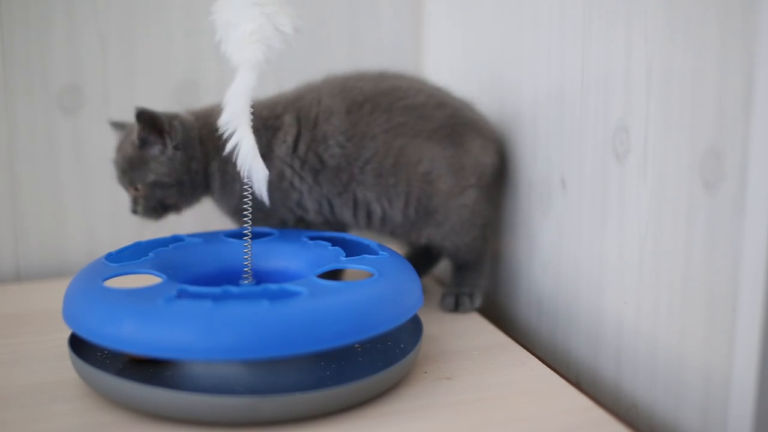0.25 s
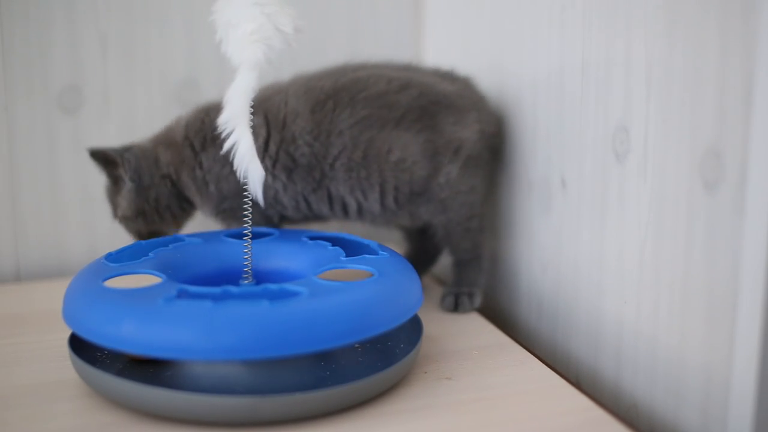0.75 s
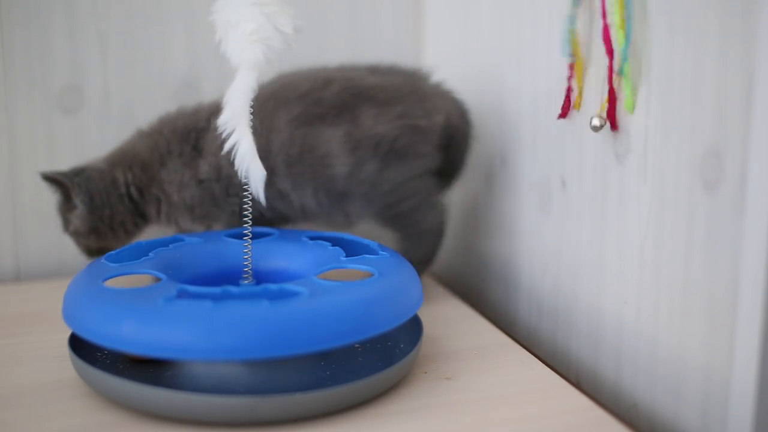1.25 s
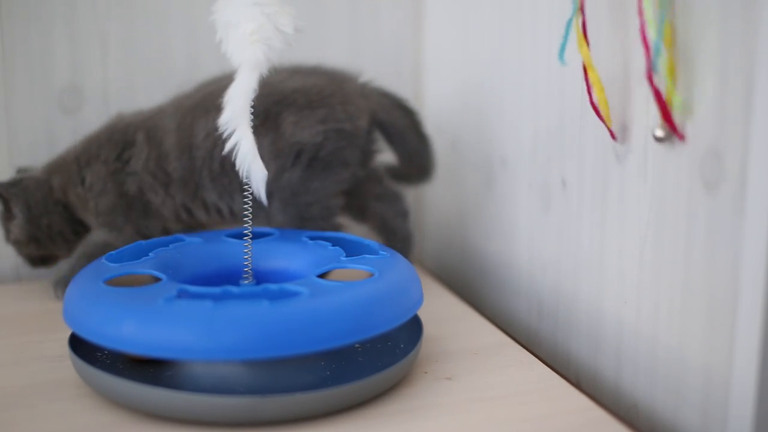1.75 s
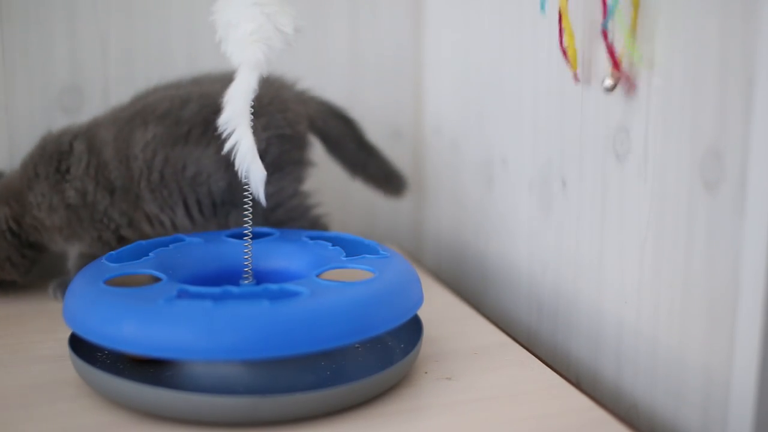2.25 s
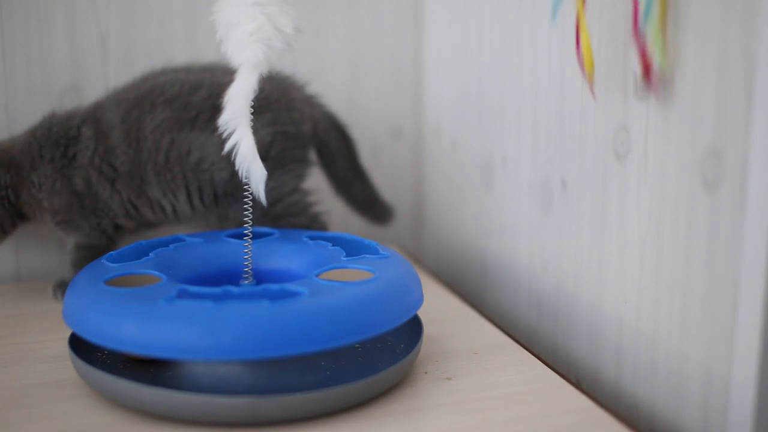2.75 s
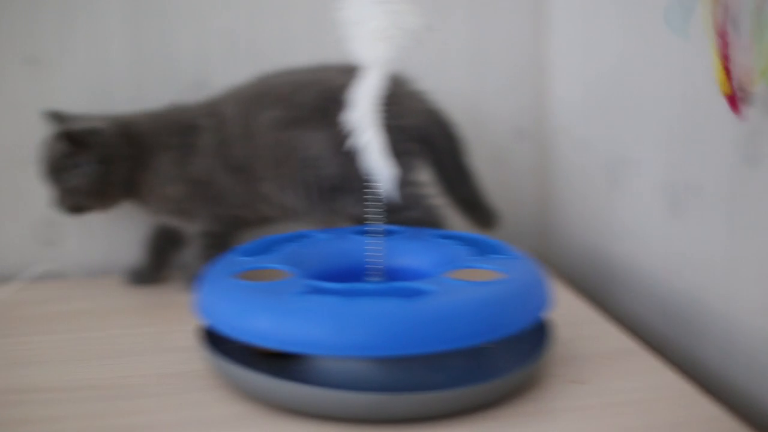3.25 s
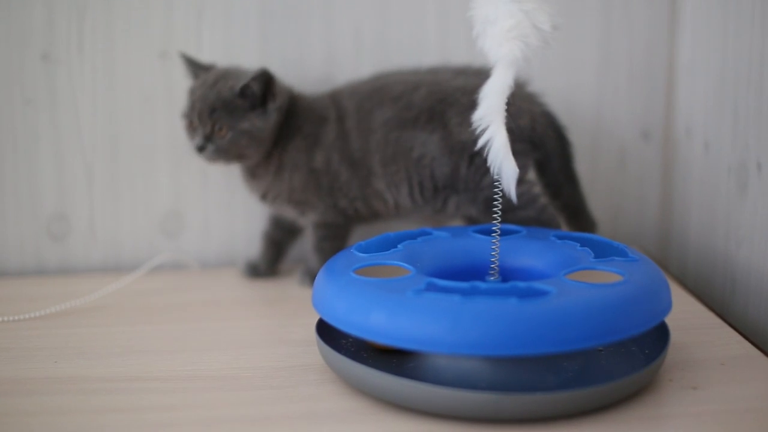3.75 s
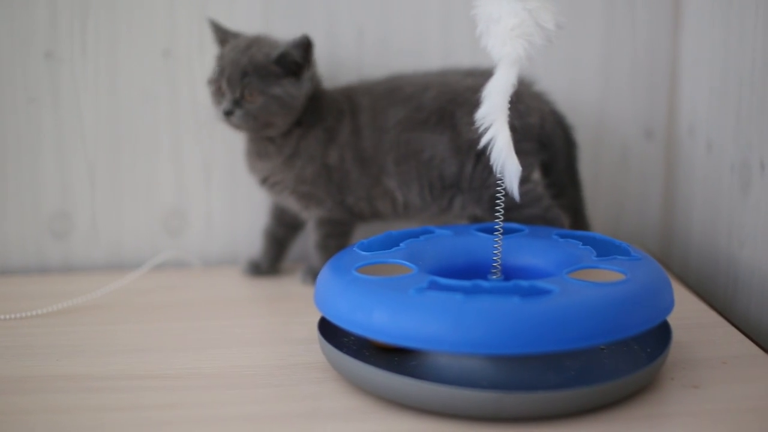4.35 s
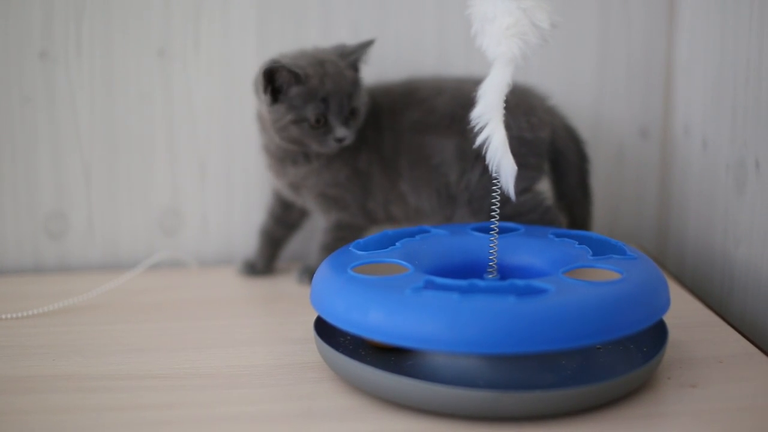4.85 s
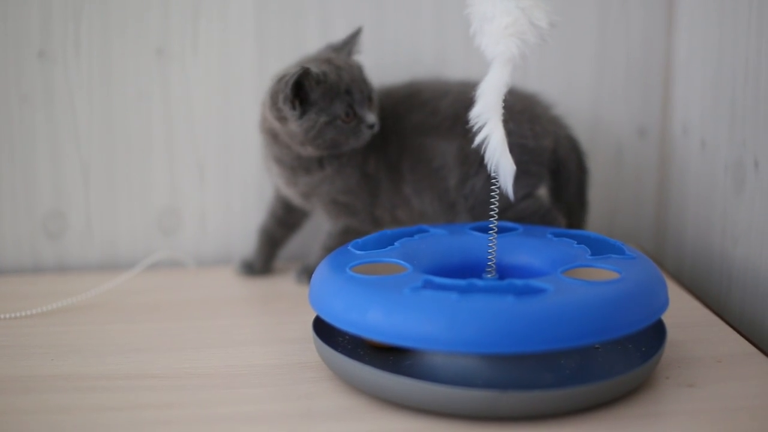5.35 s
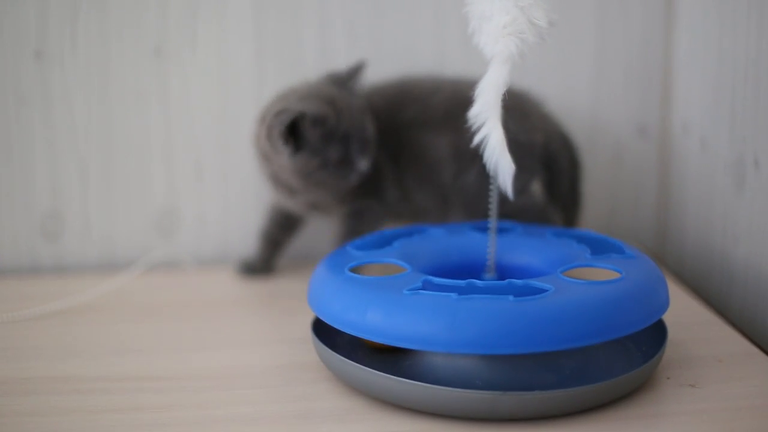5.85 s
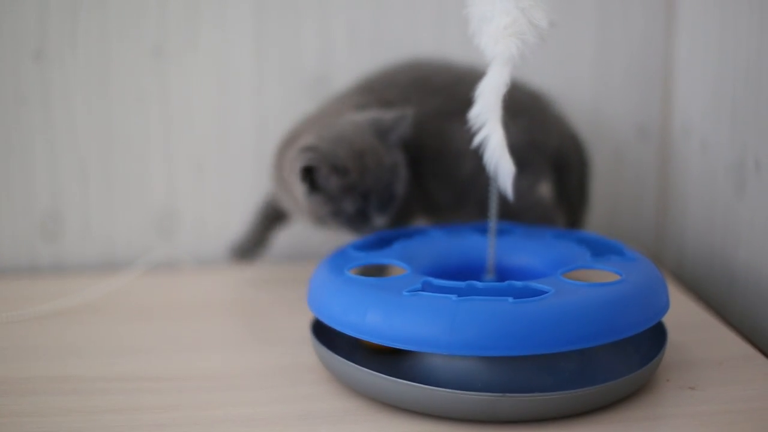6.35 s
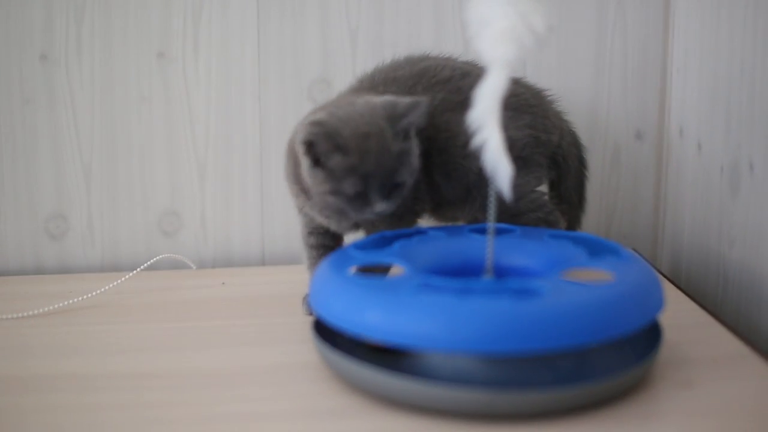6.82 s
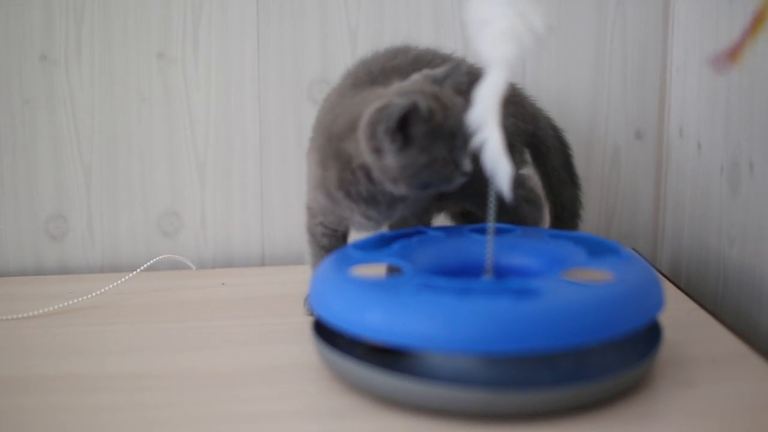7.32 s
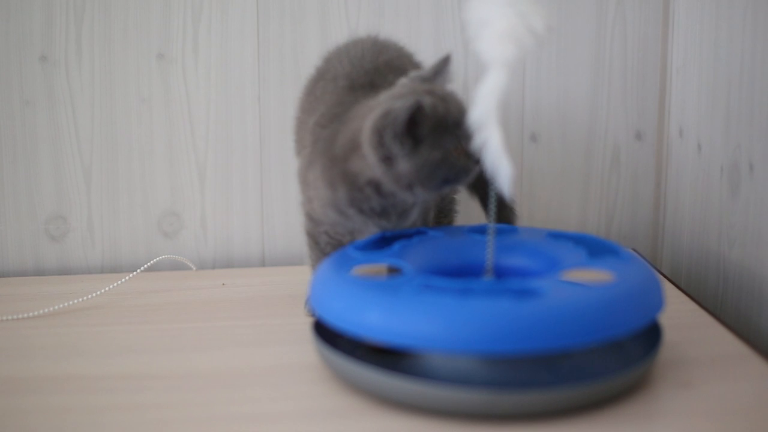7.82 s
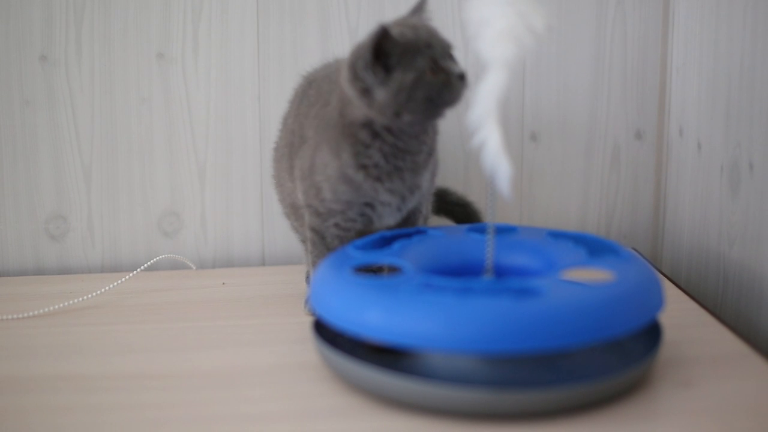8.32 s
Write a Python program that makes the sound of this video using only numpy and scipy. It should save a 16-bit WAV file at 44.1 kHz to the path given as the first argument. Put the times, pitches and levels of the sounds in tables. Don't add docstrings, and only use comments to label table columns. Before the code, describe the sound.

A small bare room with short bright echoes, steady soft hiss and faint low handling rumble. Little else happens until 1.2 seconds, when a tiny thin metal bell jingles softly, followed by a rap on wood at 1.4 and light ribbon rustle. A clearer jingle comes at 2.1, a strong rap at 2.25. From 2.7 to 3.6 the bell rings hard and repeatedly, with loud, boxy hollow plastic knocks close to the microphone, a sharp catch and duller thumps. Firm wooden raps quicken between 3.8 and 4.8, with a bright tip bounce at 4.2 and a jingle at 4.84. A stick scrapes the plastic rim around 5.2; a knock, clicks and grainy dragging follow from 5.45, with a loud click at 6.36 and rustling until 6.7. Separate raps fall at 7.2, 7.9 and 8.3, with a soft jingle around 7.6 and a last click at 8.5.

```python
import sys
import numpy as np
from scipy import signal
from scipy.fft import rfft, irfft, next_fast_len
from scipy.io import wavfile
from scipy.ndimage import map_coordinates

SR = 44100
rng = np.random.default_rng(int(sys.argv[2]) if len(sys.argv) > 2 else 0)


def voltage_ratio(level):
    return 10 ** (np.asarray(level, float) / 20)


def bounce(signal):
    frames = np.transpose(np.atleast_2d(signal))
    limited = np.clip(frames, -1, 1)
    pcm = np.round(limited * 32767).astype(np.int16)
    wavfile.write(sys.argv[1], SR, pcm)


N = 378378
SPAN = 2 ** 15
HZ, T = np.fft.rfftfreq(SPAN, 1 / SR), np.arange(SPAN) / SR


def raps():
    # (t/s, peak level/dB, snap/dB, tick/dB, body/dB)
    rap_events = [(1.427, -18.5, -14.5, -25, -1), (1.702, -36, -25, -29, -9), (1.812, -34.5, 17, 14.5, -5),
                  (1.891, -35, -56, -32, 6), (2.25, -10.5, -8.5, -20, -1.5), (2.77, -25, -16, -29, 1.5),
                  (3.1162, -16.5, -7.5, -22, 3), (3.2806, -20, -14.5, -29, -2.5),
                  (3.837, -12.5, -12, -25, -3), (4.2148, -8.5, -9, -20, -4), (4.4051, -10.5, -7, -15.5, -3),
                  (4.562, -13, -8, -18.5, -4), (4.708, -35, 11, 9, -5), (4.751, -27.5, 8, 1.5, -1),
                  (4.8146, -16, -14, -24, -5), (5.084, -35, -1.5, -2, -5.5),
                  (5.258, -21.5, -9.5, -23, -1.5), (6.786, -35.5, -28, -19, -6.5),
                  (7.201, -17, -8.5, -24.5, -2), (7.56, -32.5, -18, -21, -2),
                  (7.895, -15, -11, -29.5, -3.5), (8.284, -11.5, -9.5, -28, -3),
                  (8.474, -21, -13.5, -29.5, -3)]
    # (f/Hz, level/dB per Hz)
    wood = [(60, -51), (110, -19), (190, -11.5), (238, -25), (285, -0.5), (600, 1), (1200, -3.5),
            (2010, -6), (3760, -13.5), (5200, -23.5), (9000, -30), (11500, -42), (14000, -54), (15800, -63)]
    # (f/Hz, width/Hz, level/dB)
    board_modes = [(331, 143, -0.5), (573, 48, -7), (1050, 70, -11), (1365, 75, -4.5), (1470, 18, -11),
                   (1775, 22, -10), (1962, 120, -10)]
    # (f/Hz, width/Hz, depth 0-1)
    hollows = [(482, 27, 0.1), (791, 28, 0.57), (1248, 70, 0.57), (2180, 110, 0.44)]
    standing_hz = [115, 193, 283, 352, 428, 530, 560, 596, 622, 652, 702, 848, 960, 1055, 1161, 1381, 1850,
                   1987, 1335, 2500]
    # (level/dB, t60/s)
    standing_decay = [(0, 0.27), (-2, 0.41), (2, 0.16), (5, 0.13), (1, 0.2), (-1.5, 0.12), (2, 0.17),
                      (2.5, 0.19), (4, 0.19), (-2, 0.17), (1, 0.18), (7.5, 0.096), (3, 0.21), (5, 0.12),
                      (4, 0.1), (-19, 0.11), (-15, 0.1), (-2, 0.2), (-5, .15), (-1, 0.26)]
    # (delay/s, level/dB)
    wall_answers = [(.0053, -9), (.0105, -10)]

    wood_db = along(wood, HZ)
    board = sum(voltage_ratio(db) / (1 + (2 * (HZ - hz) / width) ** 2) for hz, width, db in board_modes)
    colour_db = wood_db + 20 * np.log10(1 + 0.94 * board / (voltage_ratio(wood_db) + 0.11))
    for hz, width, depth in hollows:
        colour_db += 20 * np.log10(1 - depth / (1 + (2 * (HZ - hz) / width) ** 2))

    hz = np.array(standing_hz)[:, None]
    level, t60 = np.transpose(standing_decay)[..., None]
    waves = voltage_ratio(level - 60 * (T / t60) ** 1.026) * np.sin(2 * np.pi * (hz * T + rng.random(hz.shape)))
    waves = waves * (1 - np.exp(-T / 0.02)) * (T < .6)

    spike = (T == 0) - 0.48 * (T == T[2])
    spike = spike + sum(voltage_ratio(db) * np.roll(spike, round(late * SR)) for late, db in wall_answers)
    fills = 1 - np.exp(-(T / 0.0021) ** 2)
    sparse = 1 - 0.3 / (1 + 1j * HZ / 885)

    firm_db = -29.5
    out = np.zeros(N + SPAN)
    for s, db, snap_db, tick_db, body_db in rap_events:
        thud_db = -22.0 + 1.33 * max(firm_db - db, 0)
        direct_db = -1.0 + 0.51 * (db - firm_db)
        tilt_db = along([(180, thud_db + 19.5), (380, (thud_db + 20.5) / 2 + body_db), (700, 0),
                         (2900, snap_db + 6.0), (8000, tick_db + 16.0),
                         (13000, tick_db + 28.0 + 0.42 * direct_db)], HZ)
        diffuse = irfft(rfft(echo() * fills) * sparse)
        standing = voltage_ratio(rng.normal(-50, 1.07, len(waves))) @ waves
        push = diffuse + standing + voltage_ratio(direct_db - 13.0) * spike
        add(out, s, voltage_ratio(db + 28.5) * struck(push, colour_db + tilt_db))
    return out[:N]


def thumps():
    # (t/s, peak level/dB, f/Hz, t60/s)
    pushes = [(2.839, -35, 67.4, 0.14), (2.911, -40.5, 133, 0.21), (3.491, -42.5, 111, 0.18),
              (3.588, -26.5, 243, 0.12), (3.615, -21, 239, 0.073), (3.659, -30, 206, 0.11),
              (5.515, -30.5, 113.5, 0.24), (6.024, -44, 103, 0.19), (6.107, -37, 192, 0.087),
              (6.361, -32, 442, .05), (6.401, -36, 310, 0.058), (7.558, -41.5, 289.5, 0.35)]
    out = np.zeros(N + SPAN)
    for s, db, hz, t60 in pushes:
        fade = voltage_ratio(db + 4.0 - 60 * T / t60) * (1 - np.exp(-T / 0.0035))
        add(out, s, fade * np.sin(2 * np.pi * hz * T))
    return out[:N]


def late_chatter():
    # (t/s, peak level/dB)
    bright_bursts = [
        (4.219, -25),
        (4.4095, -38),
        (4.569, -38),
        (7.206, -37),
        (7.902, -32),
        (8.29, -24),
    ]
    # (f/Hz, level/dB per Hz)
    bright_colour = [(3000, -29), (7000, -3), (11500, 7), (15800, -10)]
    return chatter([(s, db, -20, 0, .021, -4) for s, db in bright_bursts], bright_colour)


def bell():
    # (t/s, lowest level/dB, second/dB, main/dB, crack/dB)
    low_strikes = [(1.235, -63, -67.0, -54.0, -52), (1.272, -71, -68, -67, -64),
                   (1.302, -72.0, -71.0, -65, -57), (1.345, -85.0, -85.0, -82.0, -70),
                   (1.7683, -63.0, -72.0, -59.0, -51.5), (2.1107, -39.5, -58.0, -44.5, -44.5),
                   (2.138, -65, -59, -44.0, -59.0), (2.165, -85.0, -68.0, -60, -67),
                   (2.222, -59, -72.0, -72.0, -47), (2.7361, -60.0, -54.0, -35, -34.5),
                   (2.753, -49, -39, -30.5, -40.5), (2.782, -56.0, -85.0, -85.0, -60.0),
                   (2.945, -45, -53.0, -47, -34.5), (2.998, -48.0, -52.0, -50.0, -52),
                   (3.04, -83, -55, -53.0, -68), (3.129, -54.0, -58.0, -45.0, -36),
                   (3.165, -58.0, -56, -56.0, -46), (3.3075, -58.0, -46.0, -33.0, -39.5),
                   (3.322, -51, -50.0, -85.0, -41), (3.337, -59.0, -68.0, -83, -55.0),
                   (3.385, -56.0, -64, -63, -54), (3.459, -57, -61.0, -64.0, -41.5),
                   (3.468, -43, -66.0, -57, -62), (3.604, -59, -61.0, -52.0, -47.0),
                   (4.22, -57.0, -55.0, -55.0, -49), (4.841, -47, -54, -41, -41.5),
                   (4.856, -77, -43, -63.0, -52), (4.895, -57.0, -70.0, -60, -71),
                   (4.945, -71, -78, -76, -72.0), (7.5672, -85.0, -62, -50, -62),
                   (7.592, -60.0, -62, -53.0, -56.0), (7.641, -71.0, -88, -82, -68),
                   (7.653, -60, -59.0, -46.0, -43), (7.672, -59, -66.0, -62, -57),
                   (7.687, -85.0, -77.0, -73, -56), (7.715, -57, -76.0, -85.0, -68),
                   (7.746, -87, -67.0, -53, -69), (7.809, -76.0, -74.0, -85.0, -82)]
    # (t/s, middle level/dB, upper/dB, high/dB, top/dB)
    high_strikes = [(1.234, -67.0, -61.0, -53.0, -81.0), (1.272, -73.0, -73.0, -80.0, -85.0),
                    (1.302, -67.0, -68.0, -66.0, -85.0), (1.345, -85.0, -85.0, -78.0, -85.0),
                    (1.7686, -69.0, -59.0, -59.0, -85.0), (2.1095, -56.0, -53.0, -46.0, -74.0),
                    (2.138, -67.0, -58.0, -85.0, -71.0), (2.165, -73.0, -69.0, -66.0, -85.0),
                    (2.2213, -65.0, -65.0, -64.0, -76.0), (2.7367, -45.0, -46.0, -38.0, -77.0),
                    (2.752, -51.0, -41.0, -46.0, -53.0), (2.782, -64.0, -62.0, -49.0, -85.0),
                    (2.946, -45.0, -41.0, -44.0, -63.0), (2.998, -55.0, -49.0, -52.0, -62.0),
                    (3.04, -76.0, -72.0, -56.0, -85.0), (3.1294, -53.0, -51.0, -48.0, -78.0),
                    (3.165, -64.0, -54.0, -85.0, -74.0), (3.3077, -53.0, -52.0, -51.0, -57.0),
                    (3.322, -56.0, -51.0, -70.0, -85.0), (3.338, -68.0, -58.0, -53.0, -85.0),
                    (3.385, -63.0, -62.0, -59.0, -67.0), (3.458, -50.0, -50.0, -56.0, -66.0),
                    (3.468, -75.0, -63.0, -48.0, -82.0), (3.604, -56.0, -53.0, -55.0, -75.0),
                    (4.219, -60.0, -58.0, -56.0, -85.0), (4.8415, -56.0, -46.0, -53.0, -77.0),
                    (4.856, -59.0, -65.0, -40.0, -75.0), (4.895, -68.0, -59.0, -66.0, -85.0),
                    (4.945, -81.0, -85.0, -85.0, -85.0), (7.5672, -74.0, -67.0, -71.0, -80.0),
                    (7.591, -68.0, -61.0, -79.0, -74.0), (7.641, -76.0, -70.0, -65.0, -85.0),
                    (7.654, -62.0, -56.0, -51.0, -69.0), (7.672, -61.0, -61.0, -63.0, -79.0),
                    (7.688, -63.0, -53.0, -62.0, -80.0), (7.715, -82.0, -69.0, -67.0, -85.0),
                    (7.745, -77.0, -85.0, -75.0, -85.0), (7.81, -85.0, -85.0, -85.0, -85.0)]
    mode_hz = [2772, 4116, 4416, 4885, 4901, 8270, 8580, 9012, 9604, 10088, 10130, 11535, 11558, 15390]
    # (level/dB, t60/s)
    mode_decay = [(-17, .15), (-1, .28), (1, .3), (-7, .3), (-1, .32), (-3, .12), (-3, .16), (2, .28),
                  (2, .29), (-3, .28), (0, .29), (-2, .29), (1, .29), (3, .25)]
    # (f/Hz, level/dB per Hz)
    crack_colour = [(2500, -32), (4000, -3), (6000, -10), (7800, -2), (8800, -2), (10500, -9), (12000, -11),
                    (13500, -13), (15500, -22)]
    # (t/s, length/s, level/dB)
    rolls = [
        (1.3, .09, -57),
        (2.22, .04, -55),
        (3.49, 0.057, -51),
        (7.68, .06, -51),
    ]
    # (f/Hz, level/dB per Hz)
    jangle = [(3500, -40), (4100, -14), (4800, 6), (5200, -5), (5600, -24), (7000, -15), (9000, -14),
              (12500, -26), (15800, -40)]

    hz = np.array(mode_hz)[:, None]
    level, t60 = np.transpose(mode_decay)[..., None]
    half, clock = T[:SPAN // 2], np.arange(N + SPAN) / SR
    fade = voltage_ratio(level - 60 * half / t60) * (1 - np.exp(-half / 0.00054))

    quiver_rate, quiver_rad, flutter_db = 110, .75, 2.5
    knots = rng.standard_normal((2 * len(hz), round(clock[-1] * quiver_rate) + 2))
    knots[1::2] = voltage_ratio(flutter_db * knots[1::2])
    wander = np.array([np.interp(clock * quiver_rate, np.arange(len(row)), row) for row in knots])
    phase = 2 * np.pi * hz * clock + quiver_rad * np.sqrt(hz / 10 ** 4) * wander[::2]
    swing = wander[1::2] * np.sin(phase)

    rebound_s, rebound_db = 0.02, -3.5
    out = np.zeros(N + SPAN)
    for (s, *low_db, crack_db), (_, *high_db) in zip(low_strikes, high_strikes):
        share = np.repeat([*low_db, *high_db], [2, 1, 2, 4, 2, 2, 1])
        gain = np.hypot(voltage_ratio(share), voltage_ratio(crack_db - 24))
        ring = gain @ (fade * swing[:, round(s * SR):][:, :SPAN // 2])
        ring = np.pad(ring, (0, SPAN // 2))
        flights = np.cumsum(np.r_[0, rebound_s * SR * (.5 + rng.random(size=3))]).astype(int)
        pellet = sum(voltage_ratio(2 * k * rebound_db) * (T == T[late]) for k, late in enumerate(flights))
        walls = echo()
        near_walls = walls * voltage_ratio(-60 * T / 0.82)
        add(out, s, 0.95 * ring + 0.4 * irfft(rfft(ring) * rfft(near_walls)))
        crack = irfft(rfft(walls + 0.34 * (T == 0)) * rfft(pellet))
        add(out, s, voltage_ratio(crack_db + 28.5) * struck(crack, along(crack_colour, HZ)))
    rolling = swells(rolls)[0] * unit(voltage_ratio(3.5 * wobble(150)) * noise(jangle))
    return out[:N] * voltage_ratio(1.7 * wobble(55)) + rolling


def close_taps():
    # (t/s, peak level/dB, thud/dB, tick/dB, t60/s)
    taps = [(2.835, -21, -28, -23, 0.028), (2.851, -10.5, -30, -12, 0.13), (2.8673, -11, -13, 1.5, 0.13),
            (2.8771, -5.5, -27, -12.5, 0.041), (3.0491, -15, -20, -29, 0.073), (3.145, -3, -27, -21, 0.025),
            (3.1949, -21, -66, -11, 0.019), (3.561, -36, -6, -5, 0.041), (3.5768, -39, -21, -39, 0.039),
            (3.5891, -18, -15.5, -48, 0.098), (3.6178, -19, -16.5, -19, 0.037),
            (3.6247, -16.5, -16, -45, 0.1), (5.485, -21.5, -28, -30, 0.033), (5.511, -9, -35.5, -37, 0.34)]
    # (f/Hz, level/dB per Hz)
    hollow_colour = [(59, -42), (100, 1.5), (319, 4.5), (1130, -4.5), (1430, 1), (1690, -6.5), (2090, -5),
                     (2320, -12), (2630, -8.5), (3180, -9), (5170, -14.5), (5870, -24), (7730, -15),
                     (11800, -23.5), (15500, -31)]
    return chatter([(*row, -2) for row in taps], hollow_colour)


def plastic_clicks():
    # (t/s, peak level/dB, thud/dB, tick/dB, room/dB)
    click_events = [(1.7233, -37.5, 7, -5, 14), (5.448, -36.5, -24, 13, 7.5), (5.4755, -36, -22, -8, -15),
                    (5.499, -33, -24, 1, -12), (5.5132, -19.5, -21, -23, -22), (5.5675, -43, -20, 14, -12),
                    (5.658, -27.5, -38, -16, -22), (5.678, -32, -28, -34, -17), (5.7117, -37.5, 2, -5, -15),
                    (5.77, -38.5, -3, -12, -16), (5.7993, -35, -5, -6, -2), (5.8169, -37, -6, -4, -10),
                    (5.876, -36.5, -11, -1, -8), (5.888, -39, -7, -8, -10), (6.1495, -41, 1, -16, 0),
                    (6.3608, -14, -16, -5, -11.5), (6.3966, -19.5, -10.5, -15, -7.5),
                    (8.5284, -28.5, -17, 1, -16)]
    # (f/Hz, level/dB per Hz)
    plastic_colour = [(120, -27), (200, -9.5), (447, -7), (1470, -13.5), (2940, -5), (3530, -6), (4240, -1),
                      (4990, -11.5), (6330, -14.5), (7070, -14), (8030, -9.5), (9820, -15), (15800, -37)]
    t60 = 0.016
    return chatter([(*row[:-1], t60, row[-1]) for row in click_events], plastic_colour)


def stick_on_rim():
    # (t/s, length/s, level/dB)
    slide = [
        (5.19, 0.091, -36),
    ]
    # (t/s, peak level/dB)
    rim_clicks = [
        (2.8396, -22),
        (5.1417, -36),
        (5.1557, -28),
        (5.169, -38),
        (5.1936, -27),
        (5.204, -30),
        (5.217, -29),
        (5.233, -47),
        (7.714, -43),
    ]
    # (f/Hz, level/dB per Hz)
    rim_colour = [(350, -62), (600, -29), (855, -13), (1030, -25), (1300, -9), (1530, -7.5), (1990, 0.5),
                  (2340, -4), (2640, 3.5), (2990, -1), (3250, -12), (3600, -4), (4050, -14), (4700, -1),
                  (5200, -14), (6060, -17), (8070, -15), (15500, -34)]
    scrape = swells(slide)[0] * unit(grains() * noise(rim_colour))
    return scrape + chatter([(s, db, -15, -8, .03, -6) for s, db in rim_clicks], rim_colour)


def rustle():
    # (fastest moment t/s, length/s, scrape level/dB, swish level/dB)
    drags = [(1.31, 0.14, -68, -66), (1.55, 0.072, -56, -59.5), (1.67, 0.29, -58.5, -63),
             (2.024, 0.084, -49, -56.5), (2.5, 0.27, -52.5, -58), (2.62, 0.079, -54.5, -61),
             (5.46, 0.063, -51, -57), (5.506, 0.04, -42.5, -55), (5.555, 0.069, -42.5, -62),
             (5.61, .06, -60, -54.5), (5.65, 0.18, -52.5, -69), (5.82, 0.21, -52, -62),
             (6.08, 0.11, -52.5, -65), (6.31, 0.14, -61, -65.5), (6.45, 0.057, -62, -66),
             (6.535, 0.15, -47, -58), (6.66, 0.13, -50.5, -61)]
    # (f/Hz, level/dB per Hz)
    scrape_colour = [(240, -37.5), (400, -13.5), (480, -14.5), (864, -8), (1070, -21), (1520, -10.5),
                     (2510, -12.5), (6000, -26.5), (7800, -27), (13200, -120)]
    # (f/Hz, level/dB per Hz)
    swish_colour = [(2940, -8), (5000, -6), (6040, -10), (8140, -1), (13900, -8), (15500, -30)]
    # (t/s, length/s, level/dB)
    soft_raps = [
        (2.045, 0.08, -43.5),
        (2.46, 0.14, -53),
        (2.625, 0.071, -48),
        (6.12, 0.037, -49),
    ]
    # (f/Hz, level/dB per Hz)
    soft_wood_colour = [(150, -48), (250, -7), (606, 5), (770, -12), (836, 6.5), (928, -16), (993, -3),
                        (1500, -16), (1950, -49), (3300, -120)]
    low, high = swells(drags)
    grain = grains()
    ribbons = low * unit(grain * noise(scrape_colour)) + high * unit(grain * noise(swish_colour))
    return ribbons + swells(soft_raps)[0] * noise(soft_wood_colour)


def camera():
    # (t/s, length/s, level/dB)
    bumps = [(1.46, .1, -67), (2.85, 0.087, -46), (2.95, .12, -55), (3.15, .1, -56), (3.63, .12, -53),
             (3.87, .08, -63), (4.23, 0.11, -67), (4.49, 0.15, -52), (4.78, .08, -58), (5.14, 0.27, -55),
             (5.54, .12, -57), (6.06, 0.28, -61), (8.29, .08, -61)]
    # (f/Hz, level/dB per Hz)
    bump_colour = [(20, -42), (35, -22), (54, -7.5), (90, -17), (120, -3), (200, -120)]
    # (t/s, length/s, level/dB)
    leans = [(.43, 0.39, -64.5), (1.27, 0.15, -55.5), (1.53, 0.093, -47.5), (1.82, 0.34, -53.5),
             (2.62, 0.37, -58), (2.93, 0.11, -40.5), (3.2, 0.18, -71), (3.66, 0.21, -46), (4.03, 0.28, -55),
             (4.32, 0.1, -54), (4.55, 0.33, -48.5), (5.16, 0.17, -53.5), (5.67, 0.28, -48.5),
             (6.0, 0.25, -52), (6.58, 0.27, -49), (8.1, 0.19, -51), (8.35, 0.39, -49)]
    # (f/Hz, level/dB per Hz)
    drone_colour = [(88, -17), (150, 2.5), (226, -7), (274, 8.5), (334, 2), (366, -6), (450, -4),
                    (580, -50), (990, -120)]
    # (f/Hz, level/dB per Hz)
    hiss_colour = [(15, -34), (30, 0), (42, 1), (60, -0.5), (100, 1.5), (200, 2), (300, -4), (630, -2),
                   (1300, -4.5), (3200, -9), (4000, -11.5), (5000, -16.5), (6300, -20.5), (10000, -17),
                   (15800, -18.5)]
    bump = np.hypot(swells(bumps)[0], voltage_ratio(-72.5))
    drone = np.hypot(swells(leans)[0], voltage_ratio(-68.5))
    handling = bump * noise(bump_colour)
    furniture = drone * unit(voltage_ratio(2.7 * wobble(5.6)) * noise(drone_colour))
    return handling + furniture + voltage_ratio(-57.5) * noise(hiss_colour)


def chatter(table, colour):
    out = np.zeros(N + SPAN)
    for s, db, thud_db, tick_db, t60, room_db in table:
        rattle = rng.standard_normal(SPAN) * voltage_ratio(-60 * T / t60) * (1 - np.exp(-T / 0.00017))
        tilt_db = along([(400, thud_db + 13), (2600, 0.0041), (9000, tick_db + 4.5)], HZ)
        wet = rattle / np.linalg.norm(rattle) + voltage_ratio(room_db) * echo()
        add(out, s, voltage_ratio(db + 15.0) * struck(wet, along(colour, HZ) + tilt_db))
    return out[:N]


def echo():
    # (f/Hz, t60/s)
    room_decay = [(100, 0.56), (260, 0.2), (700, 0.28), (1840, 0.36), (4850, 0.41), (12800, 0.39)]
    t60 = along(room_decay, np.fft.rfftfreq(256, 1 / SR))[:, None]
    dying = voltage_ratio(-60 * np.arange(SPAN // 128 + 1) * 128 / SR / t60)
    z = rng.standard_normal(dying.shape) + 1j * rng.standard_normal(dying.shape)
    tail = signal.istft(z * dying, SR, nperseg=256)[1][:SPAN]
    tail = tail * (1 - np.exp(-T / .0011)) * (1 + .9 * np.exp(-T / .006)) * (T < .6)
    return tail / np.linalg.norm(tail)


def struck(x, colour_db):
    c = irfft(np.log(voltage_ratio(np.maximum(colour_db, -120))))
    c = np.r_[c[0], 2 * c[1:SPAN // 2], np.zeros(SPAN // 2)]
    h = np.exp(rfft(c))
    return irfft(rfft(x) * h / np.sqrt(np.mean(np.abs(h) ** 2)))


def swells(rows):
    s, length, *cols = np.transpose(rows)[..., None]
    t = np.arange(0, N / SR, 1 / 500)
    rise = np.where(t < s, 0.78, 1)
    fall_db = 17 * ((t - s) / (length * rise)) ** 2
    return [np.interp(np.arange(N) / SR, t, np.linalg.norm(voltage_ratio(db - fall_db), axis=0)) for db in cols]


def grains():
    return voltage_ratio(0.55 * wobble(65) + 1.7 * wobble(400))


def wobble(rate):
    knots = rng.standard_normal(int(N * rate / SR) + 4)
    return map_coordinates(knots, [np.arange(N) * rate / SR])


def noise(spectrum):
    m = next_fast_len(N)
    colour = voltage_ratio(along(spectrum, np.fft.rfftfreq(m, 1 / SR)))
    return unit(irfft(rfft(rng.standard_normal(m)) * colour, m)[:N])


def unit(x):
    return x / np.sqrt(np.mean(x ** 2) + 1e-20)


def along(points, hz):
    f, v = np.transpose(points)
    return np.interp(np.log(hz + 1), np.log(f + 1), v)


def add(track, s, sound):
    track[round(s * SR):][:SPAN] += sound


def scene():
    table = raps() + thumps() + late_chatter()
    toy = bell() + close_taps() + plastic_clicks() + stick_on_rim() + rustle()
    return (table + toy + camera())[None]


def top_cut(x):
    return signal.sosfilt(signal.butter(12, 15800, fs=SR, output="sos"), x)


def record(dry):
    low_pass = signal.butter(8, 16300, fs=SR, output='sos')
    band = signal.sosfilt(low_pass, np.clip(dry, -1, 1))
    return top_cut(np.clip(band, -1, 1))


dry = scene()
out = record(dry)
bounce(out)
```